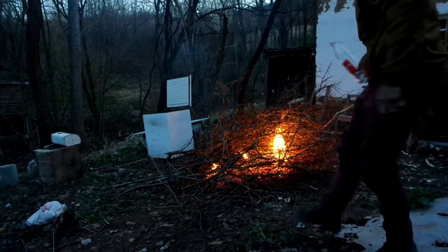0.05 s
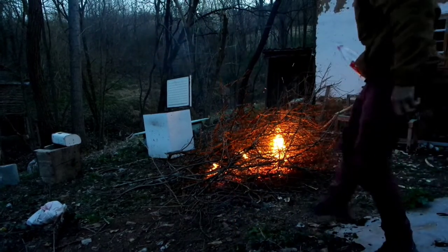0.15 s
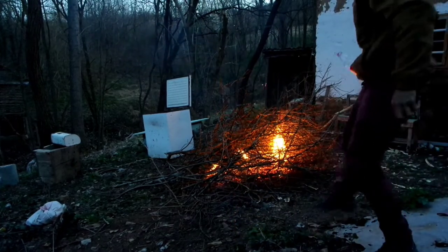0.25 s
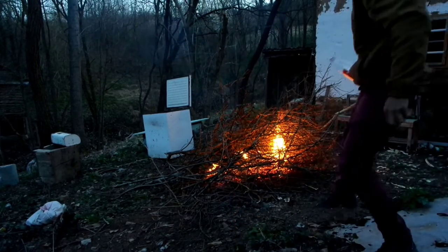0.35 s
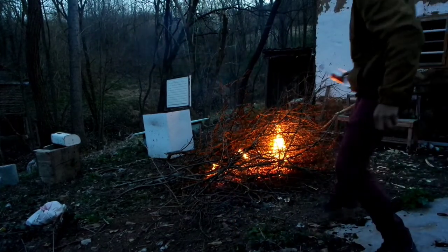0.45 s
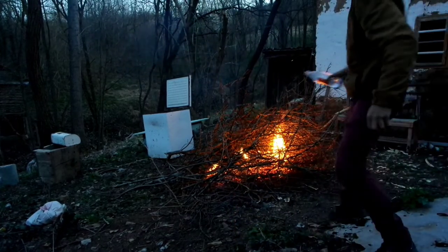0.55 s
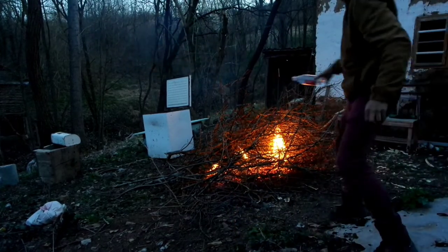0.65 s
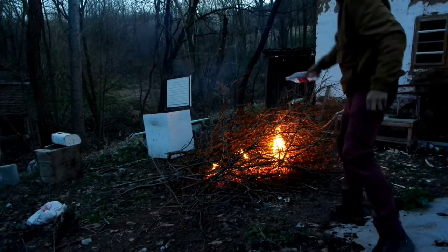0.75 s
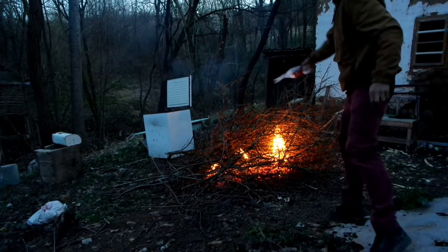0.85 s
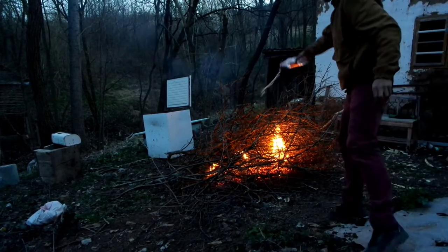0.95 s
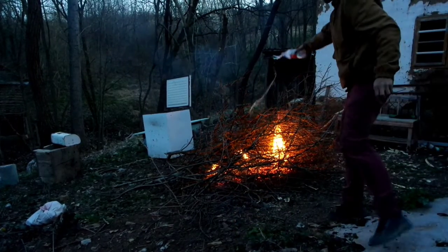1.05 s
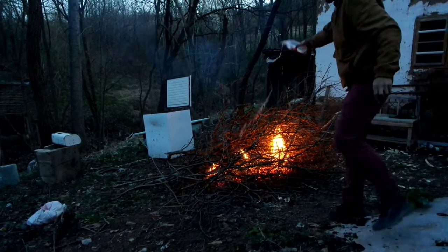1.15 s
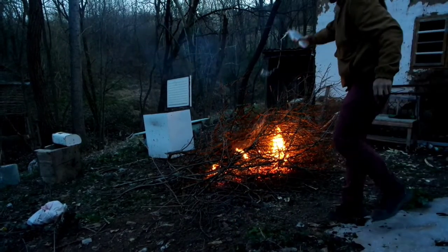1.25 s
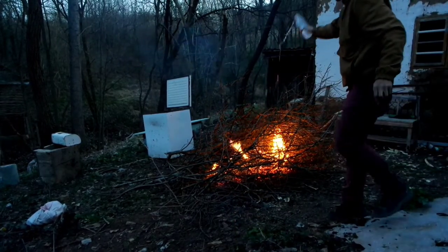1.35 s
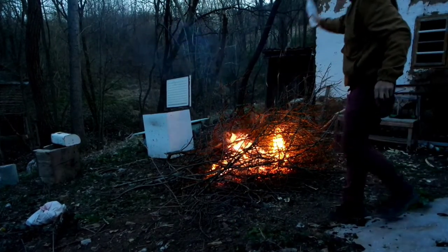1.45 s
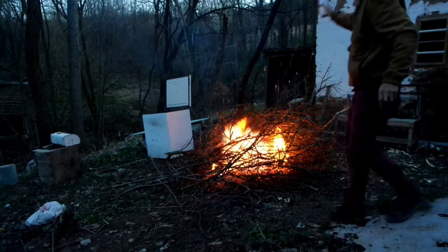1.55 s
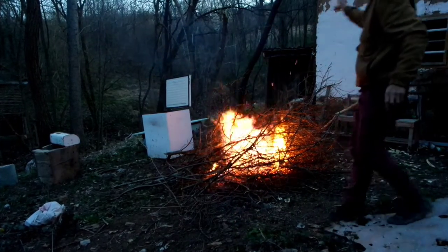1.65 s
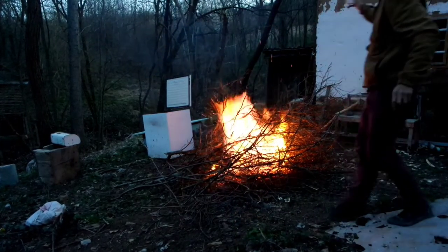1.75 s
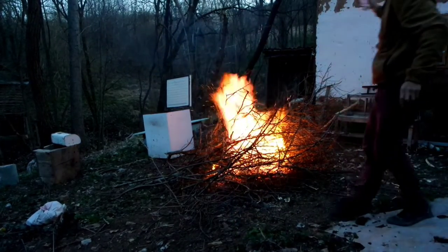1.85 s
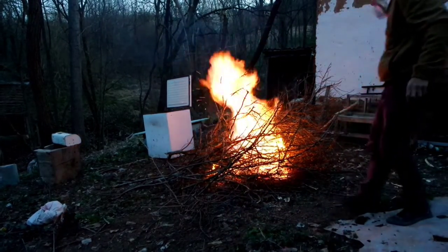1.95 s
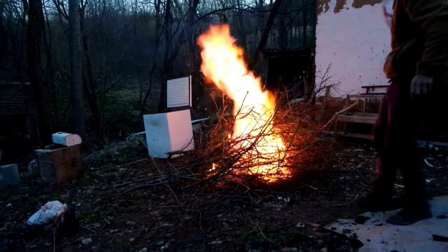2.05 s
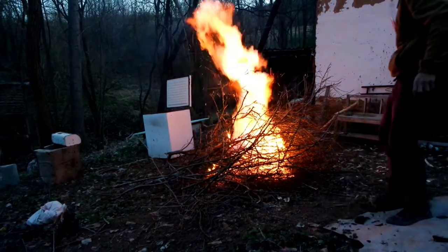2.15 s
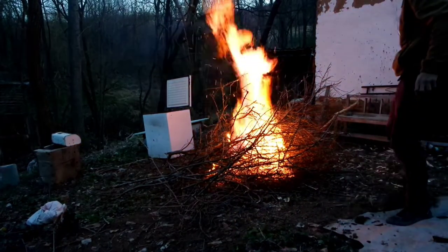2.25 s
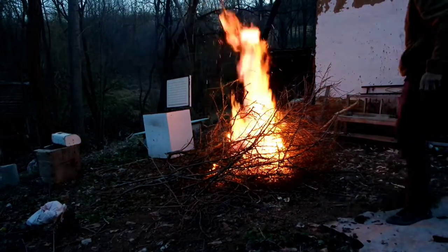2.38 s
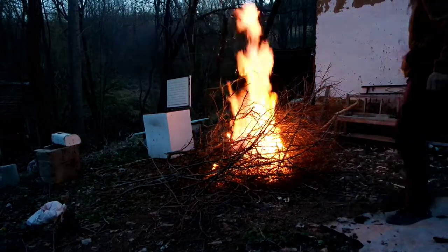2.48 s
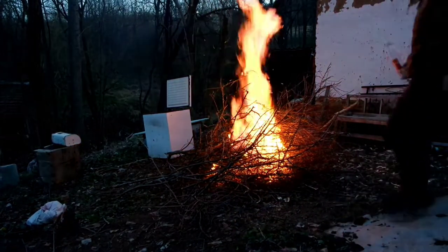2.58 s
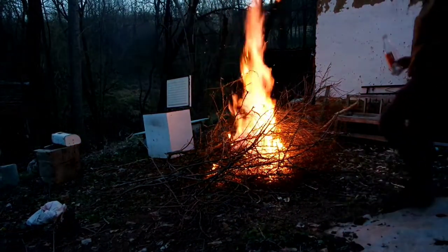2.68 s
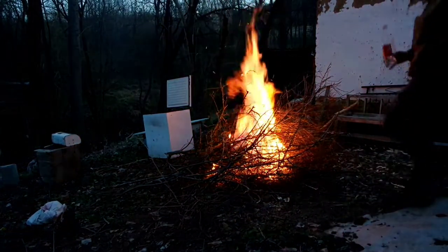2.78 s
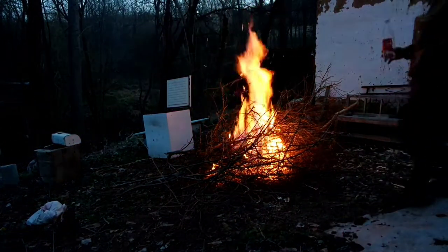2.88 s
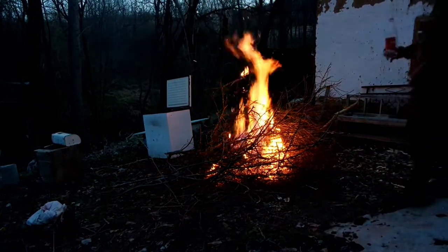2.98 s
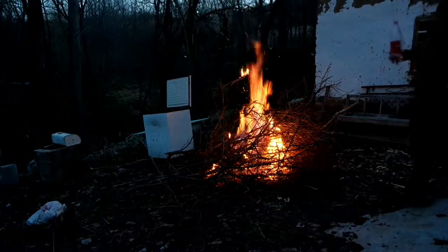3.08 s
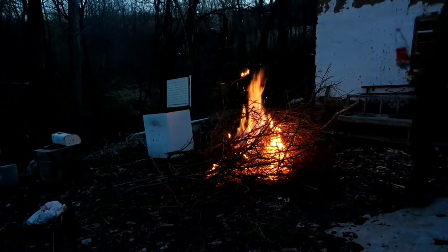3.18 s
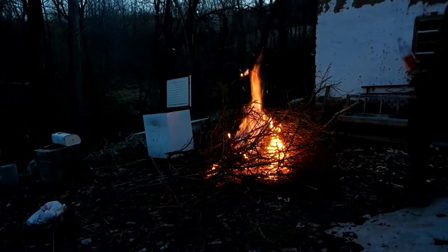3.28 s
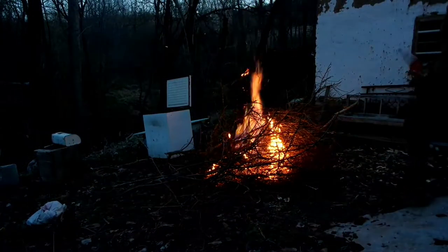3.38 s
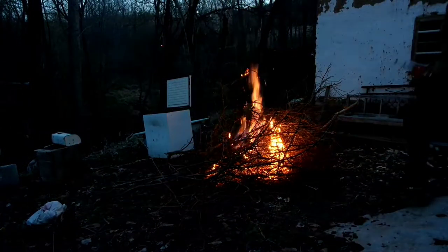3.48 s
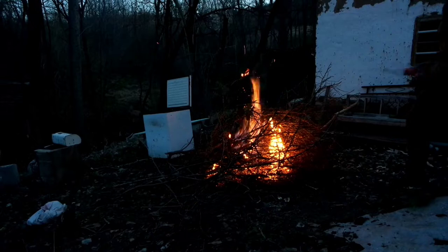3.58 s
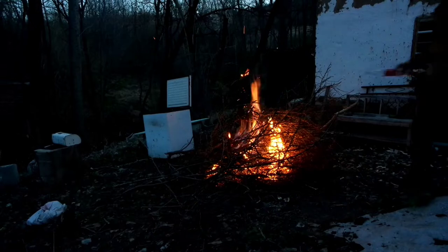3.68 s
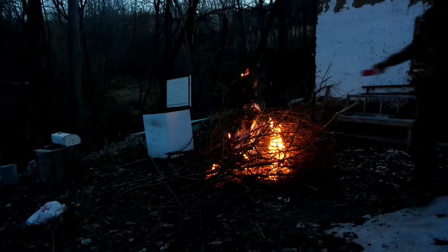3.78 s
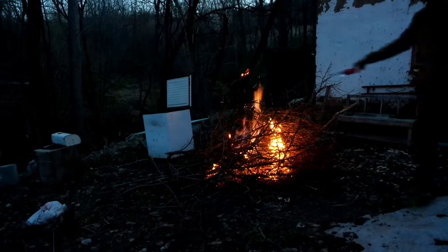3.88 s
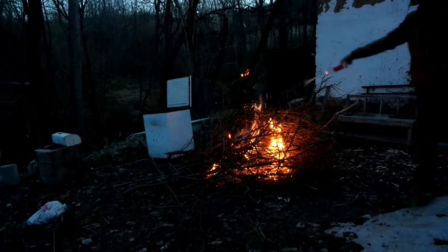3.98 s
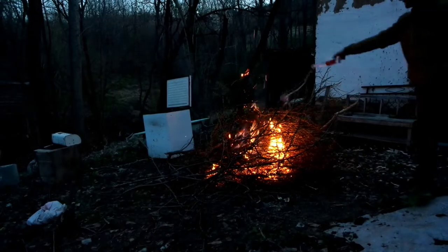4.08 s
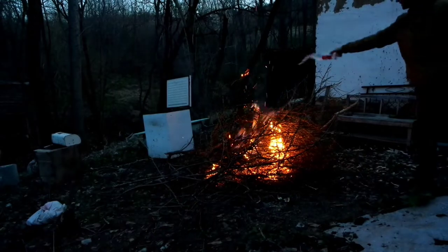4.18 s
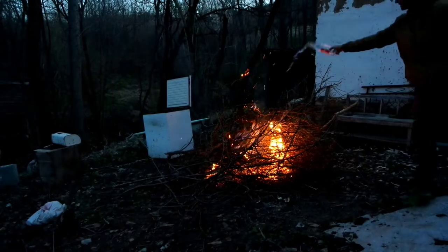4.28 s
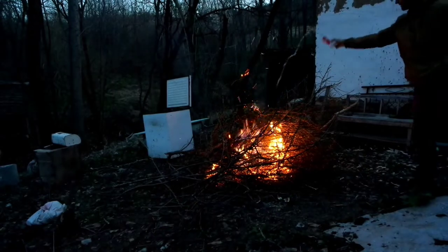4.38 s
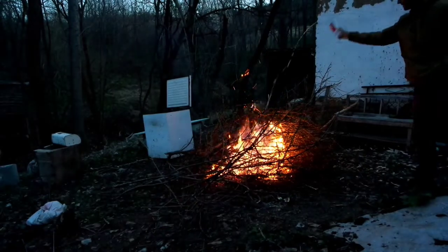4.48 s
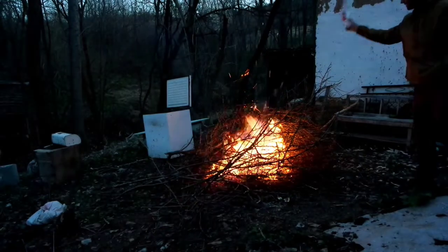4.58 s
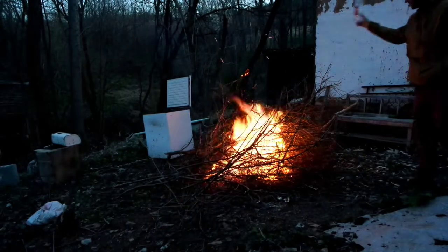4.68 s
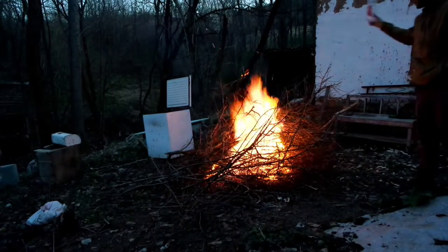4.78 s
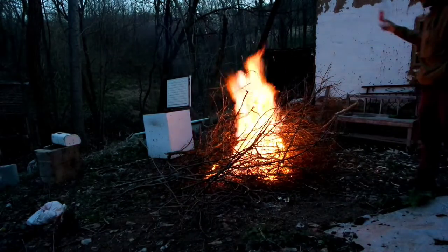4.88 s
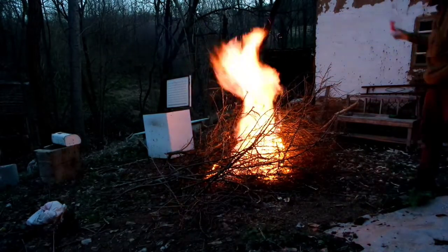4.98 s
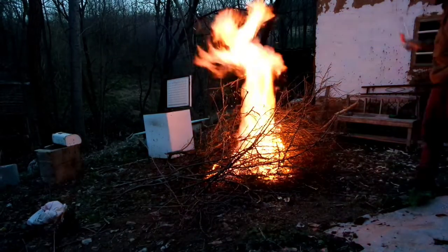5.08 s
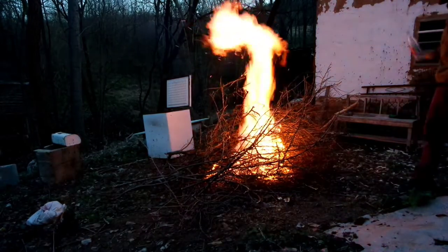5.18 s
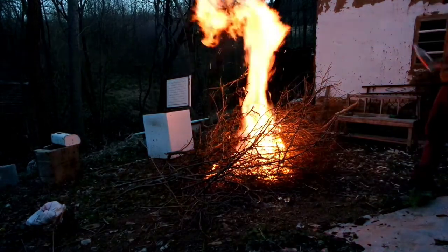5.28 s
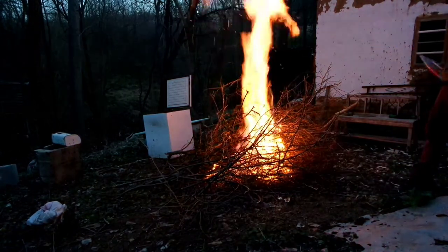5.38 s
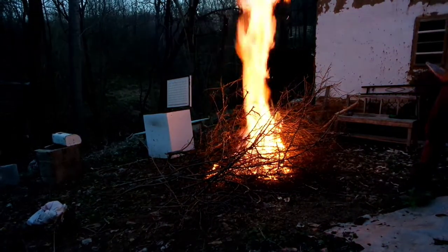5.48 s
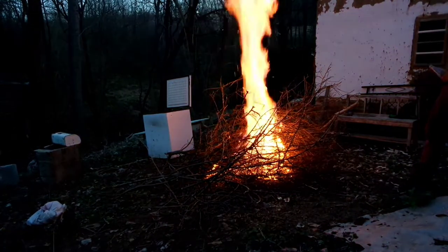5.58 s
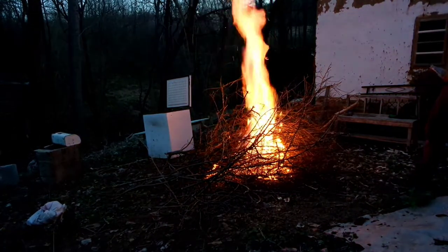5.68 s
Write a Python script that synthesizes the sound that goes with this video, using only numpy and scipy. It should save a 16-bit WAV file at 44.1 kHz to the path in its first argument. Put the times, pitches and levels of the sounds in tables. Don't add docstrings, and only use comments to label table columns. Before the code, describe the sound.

Outdoor brush fire: faint ticks and birdsong, a sudden rumbling flare with loud cracks, a lull with fuel patter, then a second roaring flare.

```python
import sys
import numpy as np
from scipy import signal
from scipy.io import wavfile
from scipy.ndimage import uniform_filter1d

SR = 44100
rng = np.random.default_rng(int(sys.argv[2]) if len(sys.argv) > 2 else 0)


def wav_record(signal):
    frames = np.transpose(np.atleast_2d(signal))
    bounded = np.clip(frames, -1, 1)
    quanta = np.round(bounded * 32767).astype(np.int16)
    wavfile.write(sys.argv[1], SR, quanta)


def gain_from_db(level_db):
    decades = np.asarray(level_db, float) / 20
    return 10 ** decades


N = 253134

# time in seconds, roar level in dB.
FLAME_ROAR = [(0.0, -50), (.12, -66.5), (1.0, -64.5), (1.4, -62), (1.46, -54), (1.59, -53), (1.74, -38),
              (2.22, -36), (2.78, -38.5), (2.86, -41.5), (3.15, -39), (3.5, -43), (3.63, -52),
              (4.11, -51.5), (4.52, -53.5), (4.75, -36.5), (4.91, -37), (5.74, -39.5)]
# time in seconds, hiss level in dB.
SAP_HISS = [(0.0, -54.5), (.18, -73.5), (1.04, -69.5), (1.4, -68), (1.46, -55.5), (1.6, -51.5), (1.98, -43),
            (2.22, -48.5), (2.53, -42.5), (2.84, -49), (3.5, -49), (3.63, -60.5), (4.11, -63.5),
            (4.52, -60.5), (4.65, -46), (4.88, -51.5), (5.08, -43), (5.36, -45.5)]
# frequency in Hz, level in dB per Hz.
RUMBLE_COLOUR = [(8.8, -46), (15, 18.5), (32, -23), (59, 1), (101, -6), (141, 2), (159, -11.5), (178, -6.5),
                 (204, -4.5), (400, -19.5), (520, -65), (880, -120)]
# frequency in Hz, level in dB per Hz.
BODY_COLOUR = [(200, -18.5), (320, 3), (600, -2), (1000, -8.5), (1500, -12), (2200, -17.5)]
# frequency in Hz, level in dB per Hz.
RUSTLE_COLOUR = [(900, -6), (1500, -3), (2500, 2), (4000, -3.5), (6500, -13.5)]
# frequency in Hz, level in dB per Hz.
HISS_COLOUR = [(1500, -23), (3500, -2), (6000, -0.5), (9000, 4.5), (12500, 1), (15000, -5), (16500, 13)]
# start in seconds, level in dB, # ring in
# Hz, t60 in seconds.
KNOCKS = [(0.776, -49.5, 650, 0.02), (1.087, -38, 3120, 0.014), (1.118, -46, 2250, .012),
          (1.098, -45.5, 1220, 0.02), (.578, -57, 1470, .01), (.577, -46, 3600, .008),
          (.0035, -35, 5300, .006), (1.756, -36, 6900, .006), (.922, -60, 800, .01), (.799, -58, 600, .015),
          (1.122, -51, 800, .012), (1.417, -49, 800, .01), (1.935, -29, 700, .012), (1.951, -33, 800, .01),
          (2.612, -33, 700, .012), (3.281, -31, 800, .014), (5.506, -37, 800, .01), (3.942, -36, 1000, .01),
          (2.932, -37, 700, .01), (2.776, -33, 10600, .025), (2.7568, -20, 10500, .002),
          (5.317, -28, 7500, .008), (1.17, -52, 850, 0.055), (1.204, -44, 487, 0.031),
          (1.864, -15.5, 2230, 0.0073), (2.019, -23, 205, 0.055), (2.021, -17, 815, 0.0098),
          (2.496, -43, 2700, .015), (2.571, -25.5, 714, 0.017), (2.573, -24, 3900, 0.0097),
          (2.287, -29.5, 4500, 0.0092), (2.74, -17.5, 2100, 0.0052), (2.74, -23, 1010, 0.0064),
          (3.207, -32.5, 660, 0.026), (3.25, -38, 470, 0.045), (3.965, -38.5, 153, 0.12),
          (4.174, -41.5, 2540, .02), (4.199, -42, 1150, 0.01), (4.978, -28, 5100, 0.013)]
# start in seconds, level in dB, ring in Hz,
# swell after it in dB re level.
THIN_SNAPS = [(0.0383, -34, 13200, -26), (0.4371, -44, 6440, -31), (0.888, -34.5, 4300, -32),
              (1.045, -38, 10400, -13), (1.4172, -26, 9150, -18.5), (1.6346, -32, 8300, -21),
              (2.059, -6.5, 10200, -30.5), (4.1997, -24, 8200, -16.5), (2.5292, -17, 7300, -41),
              (2.681, -24, 6500, -10), (2.9173, -24.5, 8920, -28), (3.0817, -10, 7150, -28.5),
              (3.1386, -18.5, 11300, -28), (3.3122, -10.5, 10500, -28), (3.505, -30, 8160, -14.5),
              (3.5458, -26, 9650, -18.5), (3.6628, -27.5, 8600, -24), (3.7138, -26.5, 6960, -22),
              (3.8198, -27, 11400, -25), (3.8416, -24.5, 7380, -33), (3.8483, -26, 9980, -18),
              (4.0478, -38, 8740, -18), (4.3204, -38, 6930, -16), (4.5546, -24.5, 8300, -42),
              (4.6345, -15, 8400, -31), (4.8828, -6.5, 8950, -37), (5.3974, -18.5, 9430, -27),
              (5.5908, -3.5, 10200, -34), (5.6562, -22, 6500, -37), (5.6945, -12, 8800, -27)]
# start in seconds, level in dB, ring in Hz,
# swell after it in dB re level.
THICK_SNAPS = [(1.1537, -42, 9000, -16), (1.2018, -37, 3800, -24), (1.454, -28, 5170, -14),
               (1.82, -31, 6500, -15.5), (1.9346, -26.5, 3730, -19), (1.9743, -24, 4020, -33),
               (2.0033, -23.5, 8900, -19), (2.1326, -23, 4540, -32), (2.1971, -33, 9260, -16),
               (2.4703, -30, 7270, -8), (2.4978, -25.5, 3320, -13.5), (2.5113, -18.5, 10000, -25),
               (2.5706, -29, 3900, -32), (2.9457, -22, 6800, -17), (3.2295, -22, 7000, -14),
               (3.3466, -28, 9500, -22), (3.9204, -30.5, 9690, -26), (3.9419, -17, 5500, -14.5),
               (2.2866, -27, 7750, -13), (4.451, -40, 3600, -18), (4.9785, -32, 8000, -16),
               (5.3107, -28, 9000, -15), (5.4334, -26, 11400, -14.5)]
# start in seconds, level in dB, ring in Hz.
TICKS = [(.044, -44, 6000), (.204, -52, 9000), (.303, -56, 9500), (.815, -56, 9000), (.837, -56, 9300),
         (0.38, -54, 8590), (0.463, -42, 12200), (0.4943, -44, 11500), (0.7033, -51, 10300),
         (0.7936, -46, 10400), (1.0244, -49, 7080), (1.2945, -49, 7970), (2.119, -32, 7740),
         (2.2245, -25, 11500), (2.318, -23, 9860), (2.607, -24, 7800), (2.642, -25, 8370),
         (2.7743, -27, 10600), (2.832, -26.5, 8870), (3.5914, -27.5, 7770), (3.699, -33, 10900),
         (4.4358, -33, 10500), (4.483, -33, 11100), (4.527, -34, 8840), (4.5765, -37, 9850),
         (5.0245, -24, 8930), (5.232, -29, 9000), (5.059, -30, 11000), (5.011, -29, 11000),
         (5.567, -30, 12000), (4.229, -36, 11000), (3.379, -33, 10500), (3.333, -31, 11000),
         (2.349, -31, 10000), (2.294, -30, 9000), (5.479, -21, 11700), (5.7294, -22, 11600)]
# start in seconds, level in dB, ring in Hz.
SPLINTERS = [(1.4259, -30, 8730), (1.4359, -27, 11100), (1.4539, -23, 8100), (1.4624, -25, 10500),
             (2.3555, -24, 3400), (2.38, -37, 4000), (2.462, -22, 7630), (2.6938, -22, 8360),
             (2.9544, -25, 7610), (3.9492, -20, 7280), (3.9519, -16, 7660), (3.9555, -19, 6840),
             (5.5907, -17, 3730), (5.5967, -7, 9500), (5.599, -11.5, 10500), (2.1205, -29, 6500),
             (2.834, -33, 7000), (3.555, -33, 7200), (3.65, -45, 7500), (4.353, -45, 7500),
             (2.128, -28, 3000), (2.691, -26, 3200), (2.695, -27, 3500), (3.9625, -31, 3400),
             (1.437, -42, 3000), (.884, -55, 2800), (4.978, -28, 3600), (5.461, -30, 4000),
             (5.546, -30, 11500), (1.4125, -40, 9000)]
# start in seconds, level in dB, # ring in
# Hz.
CRACKLES = [(0.0383, -28.9, 12080), (0.4371, -42.7, 10210), (0.7714, -51.5, 8770), (0.8777, -49.7, 8780),
            (1.0447, -38.5, 9570), (1.1537, -33.9, 9610), (1.317, -49.7, 6730), (1.8205, -25.9, 8070),
            (1.9346, -27.1, 9900), (2.1603, -29.0, 8640), (2.1971, -27.9, 9640), (2.2282, -28.4, 10830),
            (2.2799, -33.2, 9890), (2.2866, -19.6, 9220), (2.3802, -27.9, 9460), (2.3871, -30.7, 7380),
            (2.4077, -30.3, 6000), (2.4847, -25.3, 10070), (2.4898, -26.7, 9330), (2.573, -27.7, 7370),
            (2.8772, -32.6, 10490), (2.9532, -24.0, 8500), (3.1819, -34.4, 9790), (3.2245, -30.5, 8310),
            (3.2564, -28.1, 9180), (3.2639, -27.6, 10650), (3.2807, -27.8, 8980), (3.2956, -25.8, 9300),
            (3.3205, -26.3, 9460), (3.3482, -26.5, 9760), (3.4862, -30.7, 10460), (3.5049, -29.2, 8240),
            (3.7317, -39.4, 10290), (3.7836, -43.4, 9330), (3.8565, -30.6, 9270), (3.8628, -33.6, 10020),
            (3.9036, -40.3, 9430), (3.9207, -31.1, 10440), (4.0065, -33.2, 9170), (4.0478, -32.3, 8910),
            (4.074, -39.0, 9910), (4.2021, -32.9, 10040), (4.2115, -29.6, 8460), (4.3204, -38.9, 9760),
            (4.4121, -40.7, 8520), (4.4571, -40.1, 8980), (4.861, -34.8, 9190), (4.8858, -27.1, 10310),
            (4.9693, -32.0, 9320), (4.9886, -28.5, 7690), (5.2898, -28.9, 9190), (5.3105, -24.2, 10030),
            (5.3168, -23.3, 9280), (5.3405, -26.1, 9390), (5.3819, -29.1, 10900), (5.434, -25.6, 10800),
            (5.4441, -26.2, 10500), (5.4688, -25.5, 9320), (5.4917, -29.7, 10550), (5.5936, -22.9, 10900)]
# start in seconds, level in dB, ring in Hz.
POPS = [(1.1163, -43.5, 2280), (1.2051, -46.0, 2290), (1.3167, -47.6, 2900), (1.4171, -32.6, 3590),
        (1.6349, -35.6, 3130), (1.7735, -31.9, 2580), (1.8847, -31.5, 2760), (1.94, -28.4, 2720),
        (2.0223, -30.1, 2240), (2.0356, -32.0, 1890), (2.0674, -32.6, 2450), (2.1329, -27.7, 2510),
        (2.38, -31.9, 3250), (2.5715, -24.2, 3240), (2.7515, -28.3, 2200), (2.8082, -33.7, 3460),
        (2.9611, -27.4, 2970), (3.1135, -32.5, 3860), (3.1389, -30.4, 3740), (3.2077, -33.0, 3410),
        (3.2295, -28.5, 3460), (3.2639, -31.3, 1930), (3.3119, -24.4, 3940), (3.4196, -38.6, 4000),
        (3.505, -35.9, 3660), (3.5462, -37.9, 3990), (3.5913, -39.9, 3270), (3.7137, -37.6, 3610),
        (3.7318, -43.3, 2530), (3.8488, -36.9, 3090), (3.9496, -25.5, 3560), (3.9554, -29.9, 2890),
        (4.1989, -40.0, 1270), (4.2116, -35.9, 3050), (4.2395, -40.2, 3050), (4.609, -38.7, 3540),
        (4.8824, -23.3, 3790), (4.9363, -37.0, 1980), (5.047, -25.6, 2800), (5.1032, -30.3, 2710),
        (5.5147, -30.4, 3020), (5.5906, -19.7, 3800), (5.5965, -21.6, 3850), (5.6944, -23.9, 3240)]
# start in seconds, level in dB.
FALL = [(0, 6500, -17), (.04, 6000, -3), (.056, 5330, 2), (.078, 3950, -5.5)]
FALL_CALLS = [(0.126, -66.5), (0.286, -65.5), (.443, -62.5), (0.608, -62.5)]
HOOK = [(0, 4820, -7), (.04, 5115, 9.5), (.055, 5500, 2), (.07, 5470, -19)]
HOOK_CALLS = [(1.425, -56), (1.645, -60), (1.855, -57)]
RISE = [(0, 3454, 0), (.025, 3857, 0), (.048, 4330, 5.5), (.062, 4580, -17)]
RISE_CALLS = [(2.708, -54), (2.812, -54), (2.922, -54), (3.034, -52), (3.15, -52.5)]
SLIDE = [(0, 4590, -10), (.012, 5250, 2), (.032, 5700, -1), (.042, 6300, -9), (.052, 6650, -1.5),
         (.17, 6600, -6)]
SLIDE_CALLS = [(4.517, -58.5), (4.7, -53), (4.88, -51.5), (5.07, -54)]
DIP = [(0, 2973, -3), (.05, 2766, -4), (.1, 2365, -3), (.145, 2163, -9), (.22, 2498, -3), (.279, 2630, -5)]
DIP_CALLS = [(5.453, -45)]
# start in seconds, length in seconds,
# first pitch in Hz, last pitch in Hz, level in dB.
SWOOPS = [
    (1.087, .062, 4980, 3580, -55),
    (1.222, 0.072, 6400, 4300, -59),
]
SETTLES = [
    (1.335, 0.065, 4200, 4100, -64),
    (1.768, 0.086, 4900, 4000, -60),
    (2.323, .14, 6800, 5830, -45.5),
    (5.252, .1, 4480, 4280, -47),
]
HELD_NOTES = [(.05, .15, 9250, 9100, -77), (0.529, .51, 10540, 10300, -84), (1.04, .32, 10400, 10600, -76),
              (0.759, 0.1, 3060, 3040, -78), (0.869, 0.17, 7850, 6850, -67.5),
              (1.555, .05, 4630, 3450, -59), (2.496, 0.05, 4250, 3480, -48), (3.279, 0.14, 7400, 6950, -53),
              (3.456, 0.073, 5800, 3850, -54), (3.975, 0.17, 2305, 2150, -61),
              (4.268, .02, 5500, 3900, -58), (4.286, .035, 3900, 3200, -60), (4.21, .07, 7270, 6350, -57),
              (4.396, .16, 6030, 5900, -59), (4.43, .2, 1875, 1840, -71.5), (4.994, .11, 2913, 2804, -51),
              (5.16, .08, 2080, 1840, -54), (2.19, .035, 3900, 3500, -56), (5.66, .03, 5600, 4000, -54),
              (5.618, .025, 5800, 4600, -57), (5.39, .02, 5000, 4000, -55), (5.495, .1, 3000, 2450, -54)]
# share of the note that glides, bend of the glide,
# share before the peak, start level in dB, end level in dB.
SWOOP, SETTLE, HOLD = (1, 3.2, .4, -5, -12), (.24, .9, .25, -10, -14), (1, 1.0, .25, -3, -7)
# start in seconds, length in seconds, level in dB.
LEAF_STIRS = [(1.048, 0.1, -56), (1.186, 0.16, -62), (1.908, 0.083, -42.5), (2.09, 0.11, -44),
              (2.463, 0.093, -56), (2.653, 0.082, -42), (3.239, 0.064, -45.5), (3.931, 0.067, -50),
              (4.184, 0.1, -59), (4.265, .1, -60.5), (4.58, 0.17, -48), (4.96, 0.25, -45),
              (5.606, 0.18, -65)]
# start in seconds, end in seconds, level in dB.
SPLASHES = [
    (1.14, 1.2, -68),
    (3.4, 4.35, -58.5),
    (3.19, 3.34, -50.5),
]


def evened(x):
    return x / np.sqrt(np.mean(x ** 2) + 1e-20)


def add(mix, s, sound):
    part = mix[round(s * SR):][:len(sound)]
    part += sound[:len(part)]


def resonate(x, hz, width_hz):
    turn = np.exp(2j * np.pi * np.cumsum(hz * np.ones(len(x))) / SR)
    r = np.exp(-np.pi * width_hz / SR)
    return 2 * (turn * signal.lfilter([1 - r], [1, -r], x / turn)).real


def noise(colour, size, patchy_db, flicker_db):
    frames, hz = 4 * N // size + 5, np.fft.rfftfreq(size, 1 / SR)
    a, b, patches = rng.standard_normal((frames, len(hz), 3)).T
    patches = uniform_filter1d(patches, size=6, axis=0)
    patches = evened(uniform_filter1d(patches, size=8, axis=1))
    flicker = evened(uniform_filter1d(rng.standard_normal(frames), size=4))
    f, db = np.transpose(colour)
    colour_db = np.interp(np.log(hz + 1), np.log(f), db, -70, -70)[:, None]
    z = (a + 1j * b) * gain_from_db(colour_db + patchy_db * patches + flicker_db * flicker)
    return evened(signal.istft(z, nperseg=size, noverlap=3 * size // 4)[1][:N])


def burst(hz, width, t60, size=400):
    t = np.arange(size) / SR
    crack = (rng.standard_normal(size) + 4.5 * (t == 0)) * gain_from_db(-60 * t / t60)
    ring = resonate(np.diff(crack, prepend=0), hz, width * hz)
    ring = resonate(ring, hz, 2 * width * hz)
    return ring / np.linalg.norm(ring)


def flames(rumble_db, body_db, rustle_db):
    hum_hz, hum_width_hz = 148.6, 20.0
    hum = resonate(rng.standard_normal(N), hum_hz, hum_width_hz)
    hum = evened(resonate(hum, hum_hz, hum_width_hz))
    roar = noise(RUMBLE_COLOUR, size=4096, patchy_db=0.83, flicker_db=0.8)
    rumble = evened(roar + gain_from_db(-6) * hum)
    body = noise(BODY_COLOUR, size=512, patchy_db=2.3, flicker_db=1.14)
    rustle = noise(RUSTLE_COLOUR, size=256, patchy_db=2.5, flicker_db=1.8)
    return gain_from_db(rumble_db) * rumble + gain_from_db(body_db) * body + gain_from_db(rustle_db) * rustle


def sizzle():
    ticks = np.zeros(N)
    clumps = gain_from_db(5.0 * evened(uniform_filter1d(rng.standard_normal(N), size=1500)))
    for hz in np.geomspace(3000, 12500, num=12):
        size = gain_from_db(3.1 * np.minimum(rng.exponential(1, N), 3))
        size *= rng.random(N) < 22 * clumps / SR
        ticks += signal.oaconvolve(size, burst(hz, width=0.7, t60=0.005))[:N]
    steam = noise(HISS_COLOUR, size=256, patchy_db=1.2, flicker_db=1.2)
    return steam + gain_from_db(-6.5) * evened(ticks)


def knocks():
    out, t = np.zeros(N), np.arange(SR // 5) / SR
    for s, db, hz, t60 in KNOCKS:
        decay = gain_from_db(-60 * t / t60)
        ring = np.sin(2 * np.pi * hz * t) + 0.6 * np.sin(2 * np.pi * 1.52 * hz * t) * decay
        add(out, s, gain_from_db(db) * decay * ring * np.minimum(t / 0.00068, 1))
    return out


def snaps():
    thin_low_db, thick_low_db, low_db_per_octave = -15, 0, -5
    out, puffs = np.zeros(N), np.zeros(N)
    t = np.arange(SR // 2) / SR
    fade = gain_from_db(-60 * t / 0.11) ** 2 + gain_from_db(-6.0 - 60 * t / 0.32) ** 2
    for twigs, low_db in ((THIN_SNAPS, thin_low_db), (THICK_SNAPS, thick_low_db)):
        for s, db, hz, puff_db in twigs:
            low = resonate(burst(2340, width=1.0, t60=0.0095), 1500, 4200)
            low *= gain_from_db(low_db + low_db_per_octave * np.log2(hz / 6000))
            add(out, s, gain_from_db(db + 7.5) * (burst(hz, width=0.92, t60=0.0017) + low))
            add(puffs, s, gain_from_db(db + puff_db) ** 2 * fade)
    small = ((TICKS, 1.0, .0037), (SPLINTERS, 1.0, .0037), (CRACKLES, .9, .003), (POPS, .6, .006))
    for cracks, width, t60 in small:
        for s, db, hz in cracks:
            add(out, s, gain_from_db(db + 7.0) * burst(hz, width, t60))
    air = signal.butter(2, 13300, fs=SR)
    return signal.lfilter(*air, 1.1 * out), puffs


def whistle(rows):
    s, hz, db = np.transpose(rows)
    t = np.arange(s[0], s[-1], 1 / SR)
    tremble, flutter = evened(uniform_filter1d(rng.standard_normal((2, len(t))), size=200))
    pitch = uniform_filter1d(np.interp(t, s, hz), size=500) + 30 * tremble
    turns = np.cumsum(pitch) / SR
    level = np.sqrt(2) * gain_from_db(np.interp(t, s, db) + 1.8 * flutter)
    return level * np.sin(2 * np.pi * turns) * signal.windows.tukey(len(t), .2)


def note(length, from_hz, to_hz, db, glide, bend, peak, start_db, end_db):
    u = np.linspace(0, 1, num=21)
    level_db = db + np.interp(u, [0, peak, 1], [start_db, 0, end_db])
    hz = from_hz + (to_hz - from_hz) * np.minimum(u / glide, 1) ** bend
    return whistle(np.transpose([u * length, hz, level_db]))


def birds():
    out = np.zeros(N)
    songs = ((FALL, FALL_CALLS), (HOOK, HOOK_CALLS), (RISE, RISE_CALLS), (SLIDE, SLIDE_CALLS), (DIP, DIP_CALLS))
    for shape, calls in songs:
        for s, db in calls:
            add(out, s, gain_from_db(db) * whistle(shape))
    for manner, notes in ((SWOOP, SWOOPS), (SETTLE, SETTLES), (HOLD, HELD_NOTES)):
        for s, *row in notes:
            add(out, s, note(*row, *manner))
    t = np.arange(SR // 2) / SR
    echo_t60, echo_rise_s = .38, .01
    wood = rng.standard_normal(len(t)) * gain_from_db(-60 * t / echo_t60) * np.minimum(t / echo_rise_s, 1)
    return out + gain_from_db(-1.5) * signal.oaconvolve(out, wood / np.linalg.norm(wood))[:N]


def stirs():
    out = np.zeros(N)
    for s, length, db in LEAF_STIRS:
        u = np.arange(0, 1, 1 / (length * SR))
        add(out, s, gain_from_db(db) ** 2 * np.interp(u, [0, 0.37, 1], [0, 1, 0]) ** 2)
    return out


def splashes():
    out, t = np.zeros(N), np.arange(SR // 40) / SR
    for s, end, db in SPLASHES:
        for at, pitch, size in rng.random((90, 3)):
            hz = 600 * 7.5 ** pitch
            drop = np.sin(2 * np.pi * hz * t * (1 + 5.8 * t))
            drop *= np.exp(-t * hz / 3.6) * np.minimum(t * hz, 1)
            add(out, s + (end - s) * at ** 1.4, gain_from_db(db + 10.2 * size ** 3) * drop)
    return out


def scene():
    t = np.arange(N) / SR
    roar_db = np.interp(t, *np.transpose(FLAME_ROAR))
    sap_db = np.interp(t, *np.transpose(SAP_HISS))
    stirred = stirs()

    def with_stirs(db, stir_db):
        return 10 * np.log10(gain_from_db(db) ** 2 + gain_from_db(stir_db) ** 2 * stirred)

    body_db = with_stirs(roar_db - 10, -5.5)
    leaf_db = with_stirs(roar_db + 0.55 * (sap_db - roar_db) - 9.5, 0)
    hiss_db = with_stirs(sap_db, -5)
    cracks, puffs = snaps()
    swell_db = 10 * np.log10(1 + puffs / gain_from_db(hiss_db) ** 2)
    swell_db = np.minimum(swell_db, np.maximum(-33.5 - hiss_db, 0))
    rumble_db = roar_db + 0.06 * (roar_db + 37)
    fire = flames(rumble_db + 0.22 * swell_db, body_db + 0.24 * swell_db, leaf_db + 0.41 * swell_db)
    hiss = gain_from_db(hiss_db + swell_db) * sizzle()
    return (fire + hiss + cracks + knocks() + splashes() + birds())[None]


def band_limit(x):
    return signal.sosfilt(signal.butter(12, 16460, fs=SR, output="sos"), x)


def record(dry):
    lowpass = signal.firwin(1023, 15020, window=("kaiser", 9), fs=SR)
    limited = signal.oaconvolve(dry, lowpass[None], "same")
    top = dry - limited
    sudden = uniform_filter1d(top ** 2, size=200) / (uniform_filter1d(top ** 2, size=4000) + 1e-14)
    leak = uniform_filter1d(np.clip(sudden - 3.0, 0, 1), size=200)
    return band_limit(limited + gain_from_db(-27) * leak * top)


dry = scene()
out = record(dry)
wav_record(out)
```